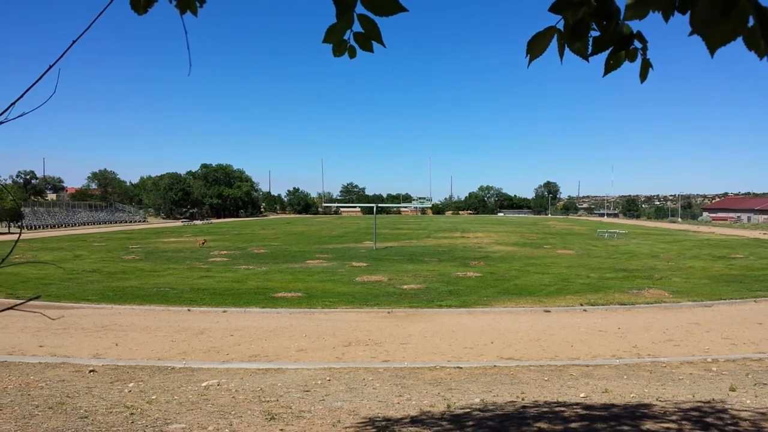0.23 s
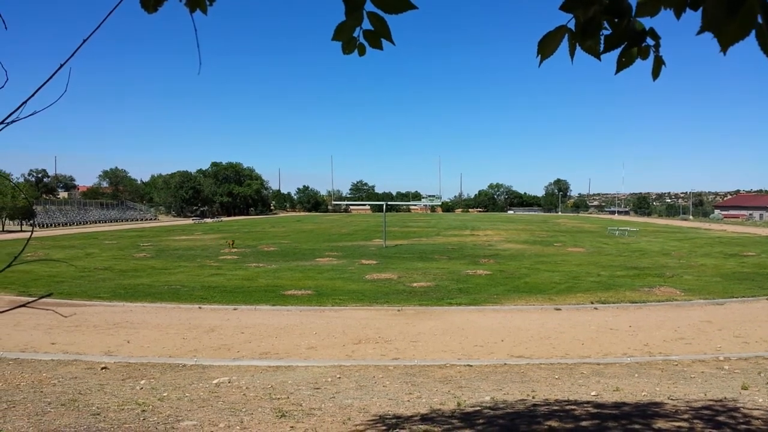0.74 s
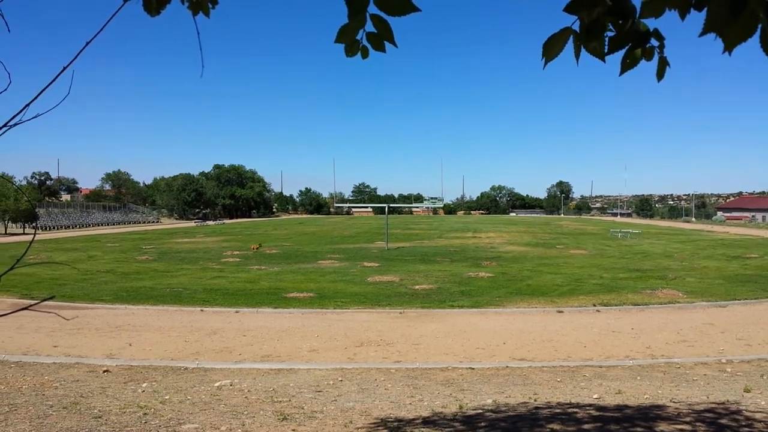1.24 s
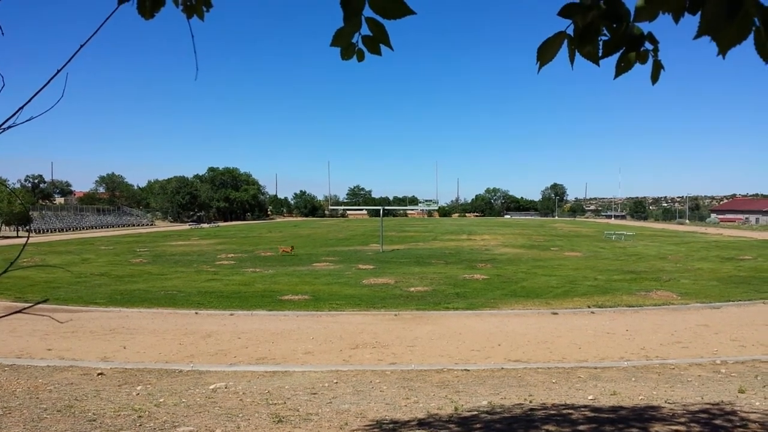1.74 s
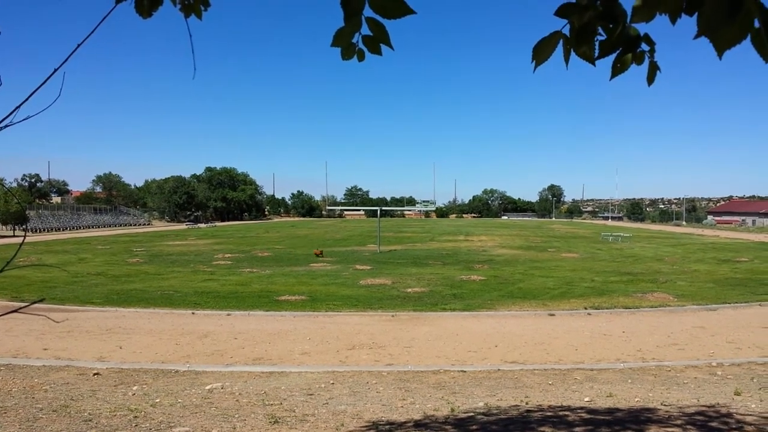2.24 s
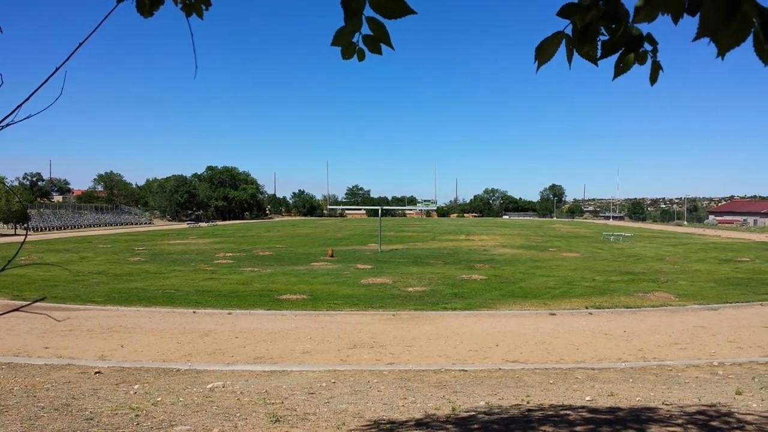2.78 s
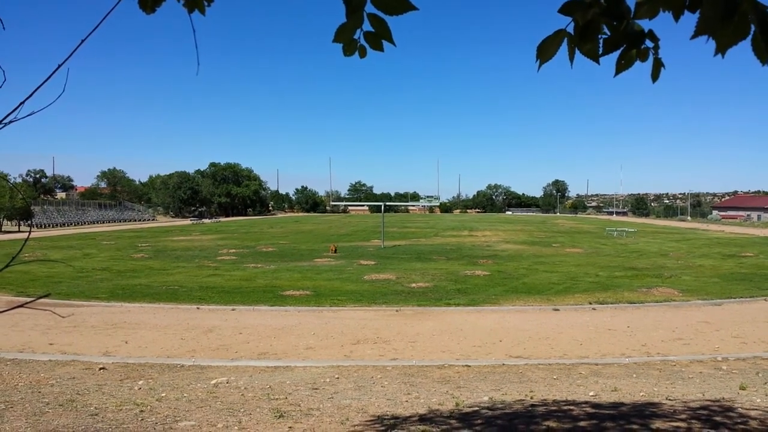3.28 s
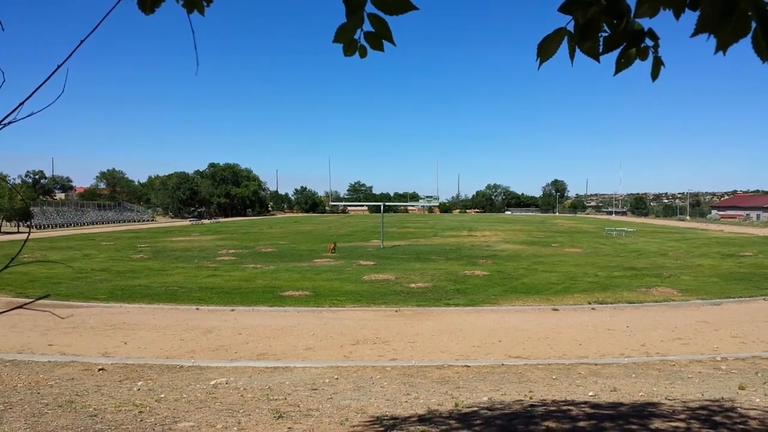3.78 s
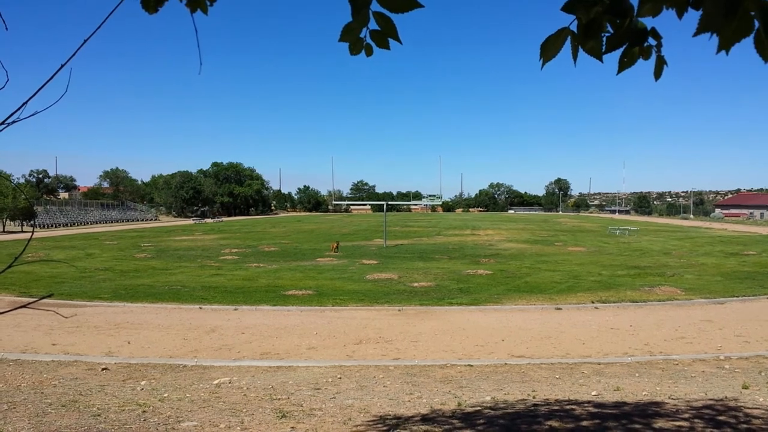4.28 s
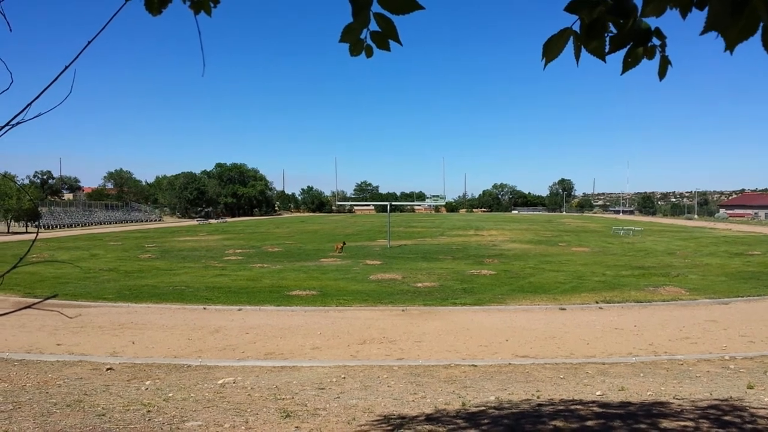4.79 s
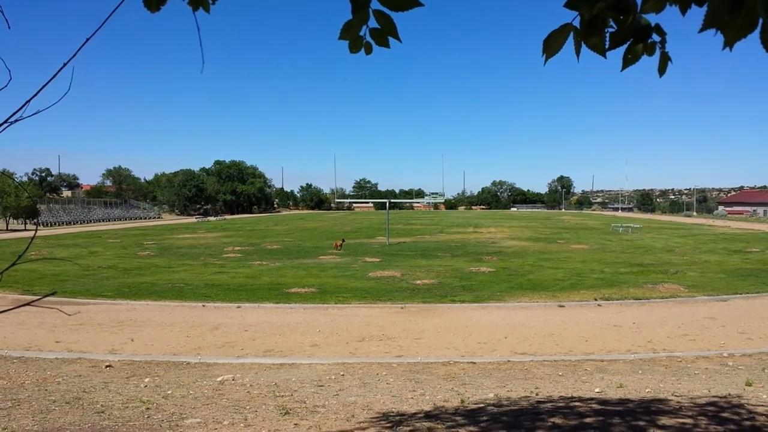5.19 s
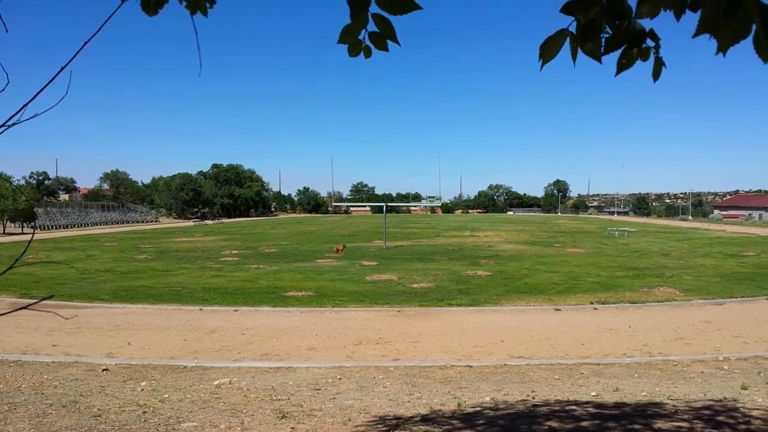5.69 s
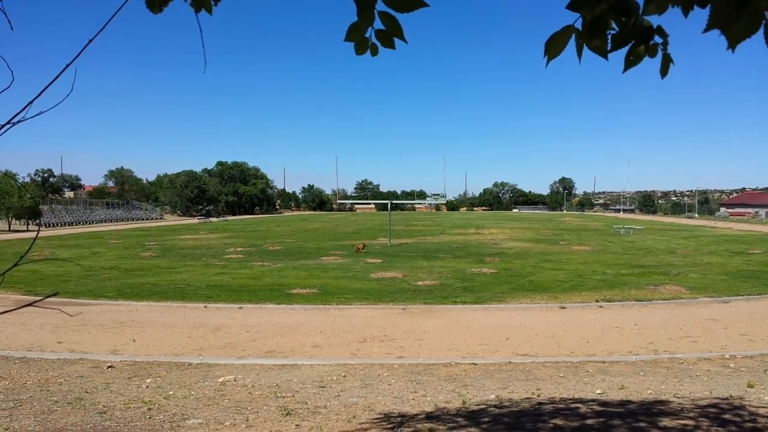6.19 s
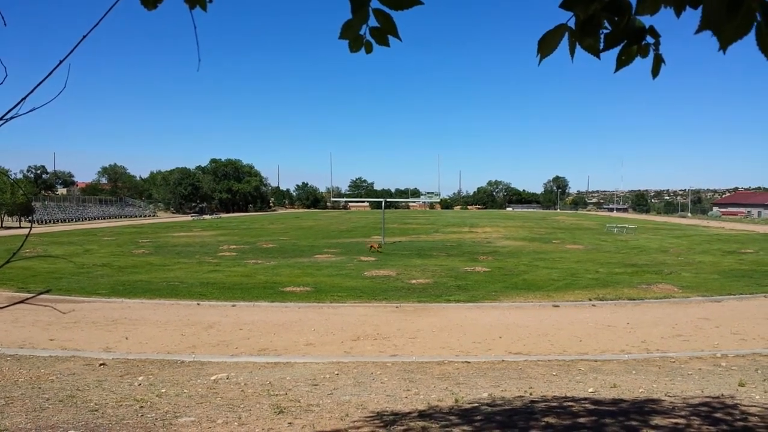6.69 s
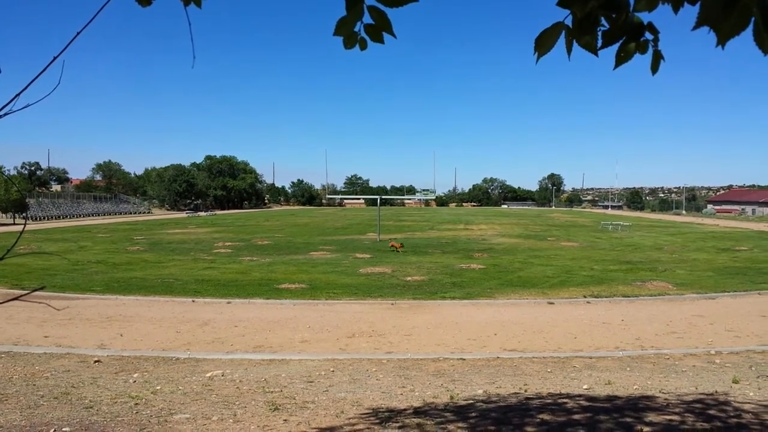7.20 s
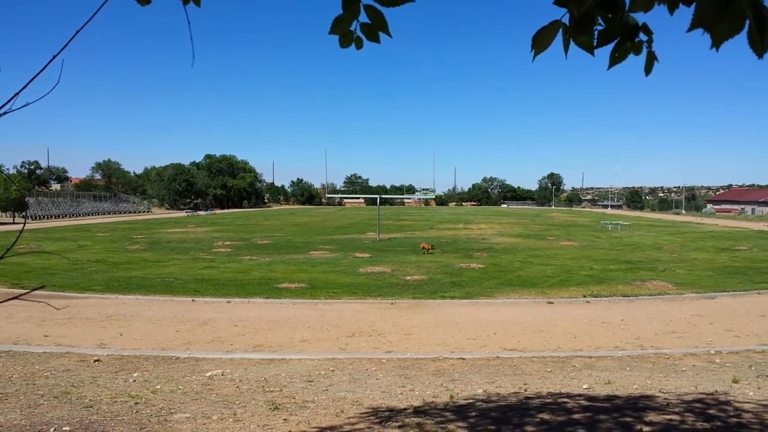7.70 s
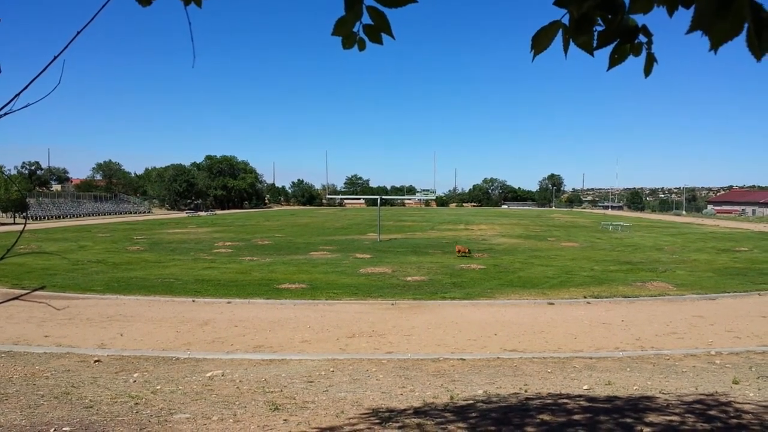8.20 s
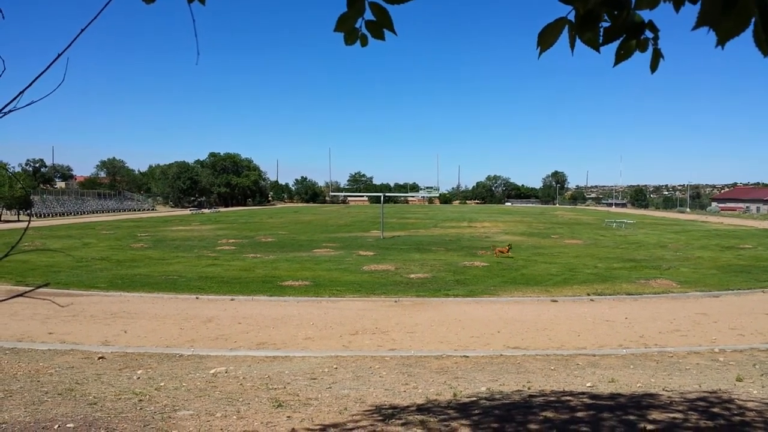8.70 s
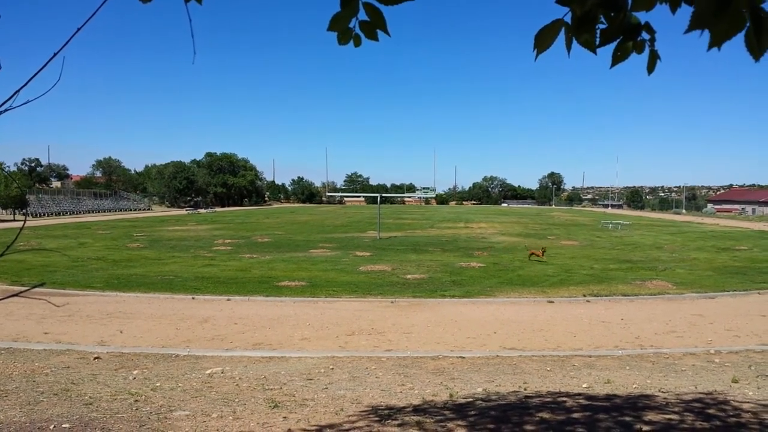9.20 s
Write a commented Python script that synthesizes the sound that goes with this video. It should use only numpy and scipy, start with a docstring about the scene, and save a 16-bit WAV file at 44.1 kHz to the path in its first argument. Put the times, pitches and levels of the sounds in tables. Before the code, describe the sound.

In an open field, distant traffic hums while a crow caws several times and prairie dogs bark about twice a second with a slight echo. Small birds whistle faintly and a truck engine swells. Midway, fingers scrape and snap loudly on the hand-held microphone, and the background briefly sinks. Scattered barks and two caws return as the engine peaks, with another loud handling snap.

```python
"""An open field, with distant traffic humming throughout. First a crow caws in a throbbing voice, and prairie
dogs bark about twice a second, echoing off the far edge; a faint whine comes and goes high above.
Small birds whistle and a truck engine swells. At 5.4 s the fingers that tick on a hand-held camera
scrape and snap loudly, and the background sinks for a second. Then barks and caws return, a faint buzz
joins and the engine peaks. Two spaced microphones hear most sources a little earlier on the right."""
import sys
import numpy as np
from scipy import signal
from scipy.fft import rfft, irfft
from scipy.io import wavfile
from scipy.ndimage import uniform_filter1d

SR = 44100
rng = np.random.default_rng(int(sys.argv[2]) if len(sys.argv) > 2 else 0)


def file_out(sig):
    """Save sig as 16-bit WAV at sys.argv[1]."""
    # one column per channel
    cols = np.atleast_2d(sig).T
    # limit, then scale
    lim = np.clip(cols, -1, 1)
    pcm = np.round(lim * 32767).astype(np.int16)
    wavfile.write(sys.argv[1], SR, pcm)


N = 416304

# How the background rises and sinks: (time [s], relative level [dB])
BACKGROUND_LEVEL = [(0, -56.5), (.5, -57), (1.1, -55), (2.4, -57), (3.0, -56), (3.5, -57.5), (4.3, -56),
                    (5.3, -60), (5.41, -62), (5.81, -71), (6.2, -71), (6.47, -63.5), (6.7, -59), (7.1, -54),
                    (7.5, -55.5), (8.33, -59.5), (8.94, -57), (9.44, -58.5)]
# Tone colour of the traffic: (frequency [Hz], relative level [dB])
TRAFFIC_COLOUR = [(12, -47.5), (20, -17), (32, -23), (59, -8), (85, -2), (200, -5.5), (391, -16.5),
                  (612, -18.5), (706, -20), (978, -17), (1150, -22), (1470, -28), (1660, -28), (2080, -38),
                  (2600, -46.5), (3380, -70.5), (5720, -120)]
# How alike the traffic is on the left and right: (frequency [Hz], likeness [0-1])
TRAFFIC_LIKENESS = [(25, .9), (60, 1), (290, 0.95), (640, 1), (1400, .4), (2500, .2)]
# Tone colour of the microphone hiss: (frequency [Hz], relative level [dB])
HISS_COLOUR = [(880, -29.5), (1500, -5), (1670, -2.5), (2070, -4.5), (2720, -4.5), (3720, -8), (5950, -9.5),
               (7160, -8.5), (8970, -10.5), (13900, -12), (14500, -12.5), (14900, -18.5), (15500, -56)]
# When the thin whine sounds: (start [s], length [s])
WHINES = [(0, .3), (.55, .2), (.85, 0.43), (1.5, .25), (1.8, .24), (2.15, .35), (2.75, .35)]
# An insect-like buzz: (start [s], length [s], level [dB], centre [Hz], rough width [Hz])
INSECT_BUZZ = (6.5, 2.5, -79.5, 7849.5, 900)
# The truck over time: (time [s], exhaust note [Hz], note level [dB], level of the other tones [dB])
ENGINE_CURVE = [(0, 83.2, -55, -68), (.45, 81.6, -50.5, -82), (.9, 79.64, -64, -57),
                (1.55, 79.8, -50, -55.5), (2.2, 76.6, -52, -50.5), (2.6, 76.3, -48.5, -60),
                (3.05, 77.95, -44.5, -49), (3.5, 77.04, -53, -50.5), (4.3, 78.03, -42, -47),
                (4.84, 77.5, -51, -63), (5.1, 78.1, -64.5, -70), (6.2, 79.5, -59, -65),
                (6.7, 83.1, -44, -41.5), (7.45, 89.85, -35, -42), (7.84, 88.96, -49, -57),
                (8.4, 86.9, -54.5, -53.5), (8.6, 86.9, -47, -68), (9.44, 84.3, -50, -47.5)]
# The engine's other tones: (frequency [multiples of 1/5 of the exhaust note], relative level [dB])
ENGINE_TONES = [(4, -6), (6, -9), (7, -3), (8, -7), (9, 0), (10, 3.5), (11, -5), (12, 0), (13, -11.5),
                (14, -15), (16, -8.5)]
# The hum of a second engine: (start [s], length [s], level [dB], pitch [Hz])
SECOND_ENGINE_HUM = [(0.503, 0.404, -53, 95.5), (1.029, 0.43, -45, 91.9)]
# Finger ticks: (time [s], strength [dB], brightness [dB], lean to the left before scaling [dB],
# left delay [ms], tuning of the lowest ring [ratio])
FINGER_TICKS = [(.0303, -17.5, -33, 22, -0.4, 1.04), (2.086, -30, -19, 9, 0, 1.44),
                (3.2213, -27, -20, 0, 0.3, 1.3), (4.066, -26.5, -23.5, 19, 0.6, 1.6),
                (4.9635, -41, -21, 1, -0.02, 0.91), (5.3807, -28, -11, 23, -0.02, 1.1),
                (5.4084, 3, -6, 19.5, 0, 1.13), (5.4225, -19, -18, 28, 0.6, 0.9),
                (5.448, -43.5, 3.5, -9, .54, 1.0), (5.5131, -42, 6, 20, 0.6, 1.0),
                (5.5689, -36, -21, 14, -0.63, 1.07), (5.605, -25, -24, 19, 0.44, 1.13),
                (5.6802, -33, -9.5, 24, -.53, 0.91), (5.8018, -44.5, -6, 19, -.27, 1.04),
                (5.9752, -31, -24.5, 23, .3, 1), (6.386, -27, -24.5, 19.5, 0.42, 1.4),
                (6.4825, -26.5, -27, 19, 0.16, 1.57), (6.6553, -26, -26, 12, 0.1, 0.94),
                (6.933, -17, -26, 13, 0.33, 1.04), (6.9507, -24, 2.5, -10.5, 0.61, 0.55),
                (7.04, -18, -25, 13, 0.1, 1.45), (7.1464, -23, -25, 15, 0.3, 0.69),
                (7.678, -27, -24, 5, 0.2, 1.2), (7.6966, -33.5, -6, 8, -0.07, 1.0),
                (7.7977, -2, -7.5, 10.5, 0.57, 0.83), (8.1612, -27.5, -24, 17, .17, 1.43)]
# The ways the camera case rings: (frequency before tuning [Hz], width [Hz], relative level [dB])
CASE_RINGS = [(860, 300, 3.5), (2500, 560, 8), (3270, 435, 4), (6600, 1350, 10.5), (8800, 910, -1.5),
              (10600, 1600, -15.5)]
# How the scrape swells and fades: (time [s], level [dB])
SCRAPE_LEVEL = [(5.33, -52.5), (5.38, -43), (5.396, -52), (5.408, -42), (5.43, -74.5), (5.668, -61),
                (5.78, -87)]
# Tone colour of rubbing skin: (frequency [Hz], relative level [dB])
SKIN_COLOUR = [(180, -37.5), (300, -2), (680, -6), (844, -16), (1000, 2), (1740, -6), (2730, -10.5),
               (4400, -9.5), (12000, -39.5), (15600, -67.5), (22000, -120)]
# Small birds: (start [s], length [s], level [dB], first pitch [Hz], middle pitch [Hz], last pitch [Hz])
BIRD_WHISTLES = [(1.34, 0.03, -49.5, 7200, 6970, 7060), (2.505, 0.039, -62, 4275, 3884, 4300),
                 (2.511, .035, -65, 4600, 4150, 4550), (3.295, 0.053, -61, 4300, 3790, 4300),
                 (3.455, 0.056, -63, 4020, 3607, 2647), (3.61, .08, -57, 4510, 4470, 4490),
                 (3.809, 0.052, -62, 4570, 4590, 4400), (4.23, .12, -70, 7560, 7610, 7610),
                 (4.4, .05, -58, 1680, 1850, 1810), (4.466, .04, -62, 2000, 2110, 2080),
                 (4.608, .03, -58, 2450, 2630, 2832), (4.925, .02, -63, 2836, 2770, 2730),
                 (5.005, 0.018, -61, 2537, 2520, 2624), (5.135, .05, -68, 4750, 4000, 4800),
                 (5.165, .055, -69, 3950, 4280, 4100), (5.221, 0.094, -64.5, 2924, 2374, 2380),
                 (5.496, 0.028, -65, 4400, 4530, 4340), (6.183, .065, -73, 4600, 4140, 4290),
                 (7.987, 0.056, -66, 4614, 4385, 4505), (8.507, 0.021, -62, 7080, 7090, 7045),
                 (9.203, .047, -63, 3980, 3350, 2418)]
# Crow calls: (start [s], length [s], effort [dB], upper resonance [dB], its centre [Hz], bite [dB],
# throat tilt [dB per octave], top pitch [Hz], depth of the pitch arch [0-1])
CROW_CAWS = [(-.16, .245, -48, 2.5, 3030, -0.5, -2.5, 562, 0.29),
             (.1, .245, -48.5, -14.5, 2900, -16, 4.5, 574, .25),
             (0.458, 0.26, -55, 0.5, 2890, -25, 5.5, 563.3, 0.15),
             (0.724, .21, -52.5, 5.5, 2840, -33, -9, 460, .04),
             (0.938, 0.27, -42, -6.5, 2950, 4.5, -3, 562.7, 0.34),
             (1.241, .225, -47.5, -15.5, 2880, -9, 4.5, 553, .2),
             (6.83, 0.27, -43, -7.5, 2897, -9, -3, 537, 0.36),
             (7.113, 0.24, -49.5, -14, 2800, -16, -0.5, 530, 0.18)]
# Tone colour of the crow's throat: (frequency [Hz], relative level [dB])
THROAT_COLOUR = [(400, -11), (700, -23.5), (1100, 5), (1650, 3.5), (2200, -14.5), (2700, -32)]
# The crow's upper resonance: (frequency [multiples of its centre], relative level [dB])
UPPER_COLOUR = [(.65, -48), (.86, -6.5), (.95, 2), (1.05, 6), (1.15, -16), (1.3, -12), (2.2, -50)]
# The crow's brightest resonance, its "bite": (frequency [Hz], relative level [dB])
BITE_COLOUR = [(3900, -13), (4400, -4.5), (4900, -5), (5400, -15), (5800, -25)]
# Prairie dog calls: (start [s], length [s], hold [s], effort [dB], top pitch [Hz], opening pitch [ratio],
# closing pitch [ratio], opening level [dB], closing level [dB], hoarseness [0-1], muzzle tuning [ratio])
DOG_BARKS = [(0.133, 0.11, 0.026, -37.5, 865, 0.82, 0.8, -8, -13.5, 0.24, 1.11),
             (0.638, 0.07, 0.014, -56, 910, .93, .9, -2, -4, 0.1, 1.06),
             (0.706, 0.092, 0.033, -51.5, 905, .8, 1, -3, -4, .2, 0.97),
             (1.191, 0.11, 0.0043, -54.5, 930, 1.0, 0.66, -2, -5, 0.25, 0.96),
             (1.699, 0.12, 0.019, -43.5, 891, .68, 0.71, -8, -10.5, 0.18, 1),
             (1.753, 0.058, 0.011, -60, 905, .9, .75, -1, -12, 0.2, 1.8),
             (2.196, 0.12, 0.021, -44, 898, .68, 0.71, -9, -18.5, 0.04, 1.04),
             (2.703, 0.13, 0.017, -45.5, 903, .68, 0.58, -6, -22, 0.07, .95),
             (3.199, 0.12, 0.014, -52.5, 900, .68, 0.62, -4, -17, 0.2, 1.0),
             (3.694, 0.12, 0.019, -52, 885, .68, 0.73, -8, -16, 0.21, 0.92),
             (4.183, 0.14, 0.011, -51.5, 878, .75, 0.54, -4, -22, 0.23, 0.94),
             (6.188, .1, 0.018, -72, 803, .9, .8, -3, -16, 0.42, 1.0),
             (6.765, 0.077, 0.014, -43, 1000, 0.67, 0.8, -13, -11, .2, 0.97),
             (7.83, 0.069, .02, -62, 803, .97, .95, -2, -10, .5, 0.88),
             (8.673, 0.056, 0.0057, -54, 954, .93, 0.89, -2, -14, 0.39, 0.96),
             (8.767, 0.084, .04, -36, 863, .84, 0.7, -8, -2.5, .33, 1.125),
             (9.107, 0.093, 0.03, -46, 1065, .63, .82, -2, -19, 0.067, 1.08)]
# Tone colour of a prairie dog's muzzle: (frequency before tuning [Hz], relative level [dB])
MUZZLE_COLOUR = [(900, -40), (1700, -18), (2600, 2.5), (3400, 5.5), (4600, -10.5), (5000, -28), (5500, -15),
                 (8000, -36)]
# Echoes off banks across the field: (delay [s], level at a muzzle tuning of 1 [dB])
BANK_ECHOES = [(0.055, -36), (.126, -19)]

HISS_DB, HISS_CEILING_DB = -3.5, -60  # hiss relative to the background level, and its upper limit
WHINE_HZ, WHINE_DB = 14000, -74
HARD_TICK_DB, SOFT_SLOPE = -10.5, 1.26  # ticks duller than HARD_TICK_DB also lose their middle rings
FAR_BARKS_PER_S, FAR_BARK_DB, FAR_BARK_LOW_HZ, FAR_BARK_SPAN_HZ = 8, -75, 2200, 1500
CAW_RISE_SHARE, CAW_DROP_S, CAW_SAG_PER_S = .42, .05, .45  # pitch climbs, sags, then drops at the end
CAW_SOFT_DB, BEAK_OPENING_DB, BEAK_CLOSING_DB = -6, -1.5, -9  # soft start; upper resonance at each end
BARK_RISE_S, BARK_SAG_PER_S = .032, 0.512  # pitch climbs, holds with a slight sag, then falls
RISE_BEND, FALL_BEND = 1.58, 1.15  # above 1, a bark's climb and fall start slowly
RASP, RASP_S = 0.48, 0.015  # extra hoarseness as a bark opens
FACING_DB = -43  # echo change per unit of muzzle tuning: bright barks face us, away from the banks
TREBLE_LIMIT_HZ = 14600


def gain_of(db):
    """Turns decibels into a number to multiply by."""
    return 10 ** (np.asarray(db) / 20)


def unit_level(x):
    """Scales a signal to an average (rms) level of 1."""
    return x / np.sqrt(np.mean(x ** 2) + 1e-20)


def look_up(table, hz):
    """Reads between a table's rows, with frequency spaced in octaves."""
    table_hz, value = np.transpose(table)
    return np.interp(np.log(hz + 1), np.log(table_hz + 1), value)


def times(start, length):
    """Time since the start of an event, leaving out what lies before zero."""
    return np.arange(max(-start, 0), length, 1 / SR)


def fades(t, length, fade_s):
    """A soft fade in and out."""
    return np.sin(np.pi / 2 * np.clip(np.minimum(t, length - t) / fade_s, 0, 1)) ** 2


def flutter(n, hz):
    """A smooth random wobble of level 1, changing about hz times a second."""
    size = max(int(SR / hz), 2)
    return unit_level(uniform_filter1d(uniform_filter1d(rng.standard_normal(n), size), size))


def place(mix, start, sound, pan_db, lag_ms):
    """Adds a sound to both microphones, louder by pan_db and later by lag_ms on the left."""
    for side, sign in zip(mix, (.5, -.5)):
        first = max(round((start + sign * lag_ms / 1000) * SR), 0)
        part = side[first:first + len(sound)]
        part += gain_of(sign * pan_db) * sound[:len(part)]


def noise(colour, patchy_db, size, likeness=None, lag_ms=0):
    """Stereo noise with drifting louder and softer patches; the sides are unrelated by default."""
    frames, hz = 4 * N // size + 5, np.fft.rfftfreq(size, 1 / SR)
    a, b, c, d, patches = rng.standard_normal((frames, len(hz), 5)).T
    patches = unit_level(uniform_filter1d(uniform_filter1d(patches, size=9, axis=0), size=7, axis=1))
    left, unrelated = a + 1j * b, c + 1j * d
    alike = 0 if likeness is None else look_up(likeness, hz)[:, None]
    shift = np.exp(2j * np.pi * hz * lag_ms / 1000)[:, None]
    right = alike * left * shift + np.sqrt(1 - alike ** 2) * unrelated
    spectra = np.array([left, right]) * gain_of(look_up(colour, hz)[:, None] + patchy_db * patches)
    return unit_level(signal.istft(spectra, nperseg=size, noverlap=3 * size // 4)[1][:, :N])


def traffic_and_hiss():
    """A wash of far traffic, alike on both sides in the bass, plus each microphone's own hiss."""
    level_db = np.interp(np.arange(N) / SR, *np.transpose(BACKGROUND_LEVEL))
    traffic = noise(TRAFFIC_COLOUR, patchy_db=1.0, size=2048, likeness=TRAFFIC_LIKENESS, lag_ms=0.19)
    traffic *= gain_of(level_db + 10.0 + np.array([[.4], [-.4]]))  # a touch louder on the left
    hiss = noise(HISS_COLOUR, patchy_db=1.63, size=512)
    return traffic + hiss * gain_of(np.minimum(level_db + HISS_DB, HISS_CEILING_DB))


def whine():
    """A thin, very high tone that comes and goes on the right."""
    out = np.zeros((2, N))
    for start, length in WHINES:
        t = times(start, length)
        tone = gain_of(WHINE_DB) * np.sin(2 * np.pi * WHINE_HZ * t)
        place(out, start, tone * fades(t, length, .03), pan_db=-15.0, lag_ms=0)
    return out


def buzz():
    """A high tone, smeared by fast wobbles into an insect-like band of hiss."""
    out = np.zeros((2, N))
    start, length, db, hz, width_hz = INSECT_BUZZ
    t = times(start, length)
    smear = flutter(len(t), width_hz) + 1j * flutter(len(t), width_hz)
    band = (smear * np.exp(2j * np.pi * hz * t)).real
    place(out, start, gain_of(db) * band * fades(t, length, 0.19), pan_db=-23.0, lag_ms=0)
    return out


def truck_engine():
    """A wavering exhaust note; under load the other tones of the firing cycle join in. A second engine hums
    briefly at a higher pitch."""
    when, *columns = np.transpose(ENGINE_CURVE)
    hz, note_db, others_db = (np.interp(np.arange(N) / SR, when, column) for column in columns)
    cycles = np.cumsum(hz * (1 + 0.004 * flutter(N, 5.8))) / SR
    note = np.sqrt(2) * np.sin(2 * np.pi * cycles) * gain_of(note_db + 2.5 * flutter(N, 6.3))
    others = 0
    for k, db in ENGINE_TONES:
        level = gain_of(db + 1.6 * flutter(N, 6.6))
        others += level * np.sin(2 * np.pi * (k * cycles / 5 + rng.random()))
    out = np.zeros((2, N))
    place(out, 0, note + gain_of(others_db) * unit_level(others), pan_db=0.5, lag_ms=.36)
    for start, length, db, hum_hz in SECOND_ENGINE_HUM:
        t = times(start, length)
        level = gain_of(db + 3.7 * flutter(len(t), 16)) * fades(t, length, .08)
        place(out, start, np.sqrt(2) * level * np.sin(2 * np.pi * hum_hz * t), pan_db=1.0, lag_ms=.2)
    return out


def finger_ticks():
    """Each tick rings the camera case for a moment, the dull rings mostly in the nearer microphone."""
    out, t = np.zeros((2, N)), np.arange(600) / SR
    for start, db, bright_db, pan_db, lag_ms, tuning in FINGER_TICKS:
        shifts = 0.895 + 0.1 * rng.random(len(CASE_RINGS))
        shifts[0] = tuning
        rings = [gain_of(ring_db) * np.sin(2 * np.pi * hz * shift * t) * np.exp(-np.pi * width * t)
                 for (hz, width, ring_db), shift in zip(CASE_RINGS, shifts)]
        middle = sum(rings[1:3]) * gain_of(SOFT_SLOPE * min(bright_db - HARD_TICK_DB, 0))
        dull = (rings[0] + middle) * np.minimum(t / 0.00031, 1)
        bright = sum(rings[3:]) * gain_of(bright_db + 7.5)
        dull_share = 1 - gain_of(2 * min(bright_db, -.5))  # what is not bright is dull
        place(out, start, gain_of(db - pan_db / 2 - 6.0) * dull_share * dull, 1.13 * pan_db, lag_ms)
        place(out, start, gain_of(db - pan_db / 2 - 11.5) * bright, 0.65 * pan_db - 4.0, lag_ms)
    return out


def finger_scrape():
    """Skin rubs on the camera case, making a short, uneven rush of noise."""
    out = np.zeros((2, N))
    when, db = np.transpose(SCRAPE_LEVEL)
    t = np.arange(when[0], when[-1], 1 / SR)
    skin = noise(SKIN_COLOUR, patchy_db=5.0, size=256)[0, :len(t)]
    level = gain_of(np.interp(t, when, db) + 1.3 * flutter(len(t), 150))
    place(out, t[0], level * skin * signal.windows.tukey(len(t), .05), pan_db=15, lag_ms=-0.27)
    return out


def grass_and_trees(voices):
    """Plants scatter the calls into a short haze that dies away by 60 dB in 0.13 s."""
    t = np.arange(SR // 2) / SR
    haze = rng.standard_normal((2, len(t))) * gain_of(-60 * t / 0.13) * (t > .004)
    haze /= np.linalg.norm(haze[0])
    return gain_of(-10) * signal.fftconvolve(voices, haze, axes=1)[:, :N]


def far_answering_barks():
    """Short, faint barks of distant prairie dogs answering, at random times between about 2.2 and 3.7 kHz,
    rising and sinking in level with the background; they are voiced like the whistles."""
    when, long, loud, pitch, bend = rng.random((round(FAR_BARKS_PER_S * N / SR), 5)).T
    start, length = when * N / SR, .015 + 0.029 * long
    hz = FAR_BARK_LOW_HZ + FAR_BARK_SPAN_HZ * pitch
    change_db = np.interp(start, *np.transpose(BACKGROUND_LEVEL)) - BACKGROUND_LEVEL[0][1]
    db = FAR_BARK_DB + 10.5 * loud + change_db
    return list(zip(start, length, db, hz * (1 - .12 * bend), hz, hz * (.86 + .12 * bend)))


def small_birds():
    """Each whistle, and each faint far bark, is a slightly unsteady pure tone that glides through three
    pitches."""
    out = np.zeros((2, N))
    for start, length, db, *pitches in BIRD_WHISTLES + far_answering_barks():
        t = times(start, length)
        hz = np.interp(2 * t / length, range(3), pitches) * (1 + 0.0021 * flutter(len(t), 150))
        tone = np.sqrt(2) * np.sin(2 * np.pi * np.cumsum(hz) / SR)
        swell = gain_of(db - 9.5 * abs(2 * t / length - 1))  # loudest in the middle
        tremble = 1 + 0.21 * flutter(len(t), 300)
        place(out, start, swell * tone * tremble * fades(t, length, .005), pan_db=10.0, lag_ms=.21)
    return out


def caw(start, length, effort_db, upper_db, upper_hz, bite_db, tilt_db, top_hz, arch):
    """A second, slow vibration makes the voice throb and drags its pitch; it slows through the caw."""
    t = times(start, length)
    rise_s = CAW_RISE_SHARE * length
    shut = np.maximum(1 - t / rise_s, 0)  # falls to 0 as the beak opens
    closing = np.clip(1 - (length - t) / CAW_DROP_S, 0, 1)
    hz = top_hz * (1 - arch * (shut ** 1.5 + 0.8 * closing) - CAW_SAG_PER_S * np.maximum(t - rise_s, 0))
    throb_hz = (70 - 26 * t / length) * (1 + 0.031 * flutter(len(t), 31))
    throb_angle = 2 * np.pi * (np.cumsum(throb_hz) / SR + rng.random())
    cycles = np.cumsum(hz * (1 + 0.04 * np.sin(throb_angle) + 0.012 * flutter(len(t), 260))) / SR
    low = high = 0
    for k in range(1, 14):
        tone = np.exp(2j * np.pi * (k * cycles + rng.random()))
        smear = flutter(len(t), 520) + 1j * flutter(len(t), 450)
        throat = gain_of(look_up(THROAT_COLOUR, k * hz) + tilt_db * np.log2(k * hz / 1300))
        low += throat * (tone * (1 + 0.21 * smear)).real
        high += (tone * (1 + 0.52 * smear)).real
    throb = 1 + 0.59 * np.cos(throb_angle)
    freqs = np.fft.rfftfreq(len(t), 1 / SR)
    resonance = gain_of(np.interp(freqs / upper_hz, *np.transpose(UPPER_COLOUR)))
    bite = gain_of(bite_db + look_up(BITE_COLOUR, freqs))
    high = irfft(rfft(high * throb ** 0.75) * (resonance + bite), len(t))
    level = gain_of(effort_db + CAW_SOFT_DB * shut) * fades(t, length, 0.015)
    upper = gain_of(upper_db + BEAK_OPENING_DB * shut + BEAK_CLOSING_DB * closing)
    return level * unit_level(low * throb), level * upper * unit_level(high)


def crow():
    """Each caw has a low, throaty part and a bright part that sits further left."""
    out = np.zeros((2, N))
    for row in CROW_CAWS:
        start = max(row[0], 0)
        low, high = caw(*row)
        place(out, start, gain_of(5) * low, pan_db=5.5, lag_ms=0.32)
        place(out, start, high, pan_db=14.0, lag_ms=.33)
    return out


def bark(start, length, hold, effort_db, top_hz, opening, closing, opening_db, closing_db, hoarse, tuning):
    """A stack of overtones arches up and down; hoarseness smears each with its own wobble."""
    t = times(start, length)
    rise = np.sin(np.pi / 2 * np.minimum(t / BARK_RISE_S, 1)) ** RISE_BEND
    past_top = np.maximum(t - BARK_RISE_S, 0)
    fall = np.clip((past_top - hold) / max(length - BARK_RISE_S - hold, .004), 0, 1) ** FALL_BEND
    hz = top_hz * (opening + (1 - opening) * rise - BARK_SAG_PER_S * past_top - (1 - closing) * fall)
    cycles = np.cumsum(hz) / SR
    hoarse = np.clip(hoarse + RASP * np.exp(-t / RASP_S), 0, 1)
    voice = 0
    for k in range(1, 11):
        tone = np.exp(2j * np.pi * (k * cycles + rng.random()))
        smear = flutter(len(t), 570) + 1j * flutter(len(t), 560)
        muzzle = gain_of(look_up(MUZZLE_COLOUR, k * hz / tuning))
        voice += muzzle * (tone * (1 - hoarse + hoarse * smear)).real
    db = effort_db + opening_db * (1 - rise) + closing_db * past_top / max(length - BARK_RISE_S, .01)
    return gain_of(db) * unit_level(voice) * fades(t, length, 0.0094)


def prairie_dogs():
    """Each bark arrives directly, then bounces back from the banks across the field."""
    out = np.zeros((2, N))
    for row in DOG_BARKS:
        start, tuning = row[0], row[-1]
        voice = bark(*row)
        place(out, start, voice, pan_db=8.0, lag_ms=.41)
        for delay, db in BANK_ECHOES:
            echo = gain_of(db + FACING_DB * (tuning - 1)) * voice
            place(out, start + delay, echo, pan_db=5.0, lag_ms=0.11)
    return out


def scene():
    """Everything that reaches the two microphones."""
    voices = prairie_dogs() + crow() + small_birds()
    field = voices + grass_and_trees(voices) + truck_engine() + traffic_and_hiss()
    return field + finger_ticks() + finger_scrape() + whine() + buzz()


def record(dry):
    """Flattens any peaks beyond full scale, then cuts the highest treble."""
    low_pass = signal.firwin(511, TREBLE_LIMIT_HZ, window=("kaiser", 9), fs=SR)
    return signal.oaconvolve(np.clip(dry, -1, 1), low_pass[None], "same")


dry = scene()
out = record(dry)
file_out(out)
```